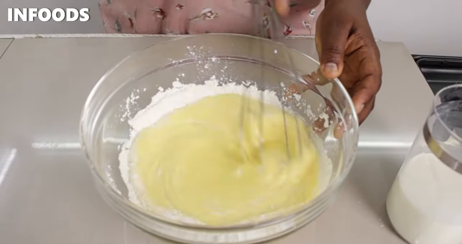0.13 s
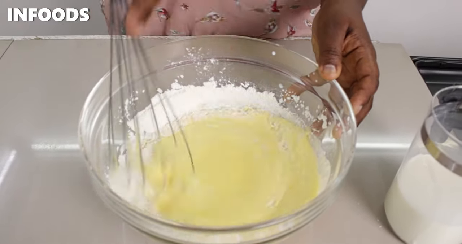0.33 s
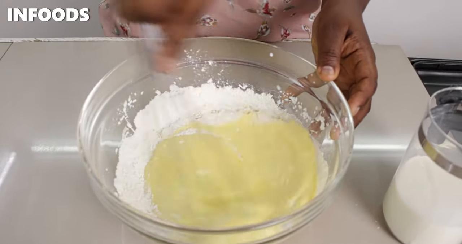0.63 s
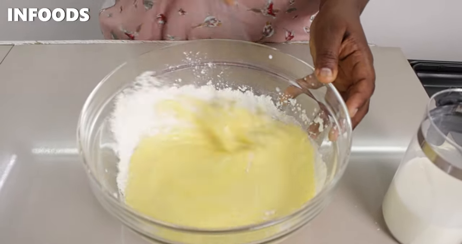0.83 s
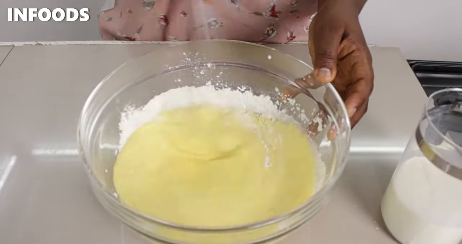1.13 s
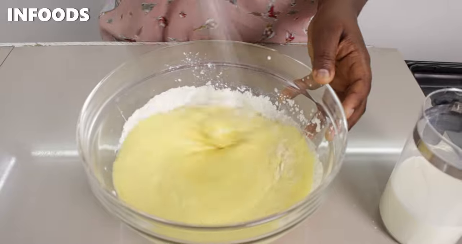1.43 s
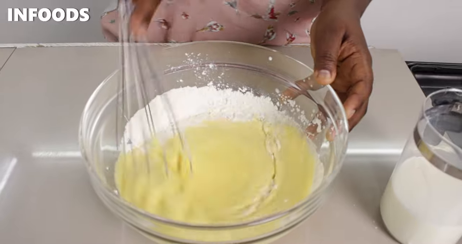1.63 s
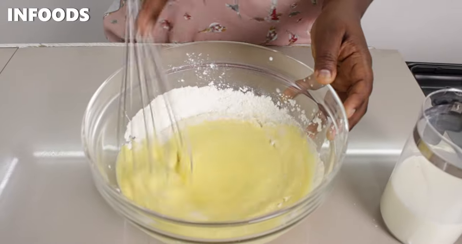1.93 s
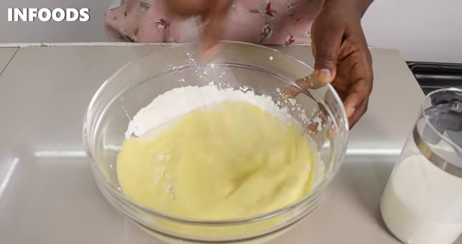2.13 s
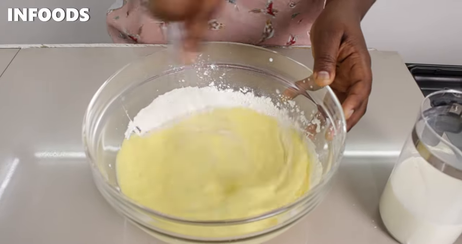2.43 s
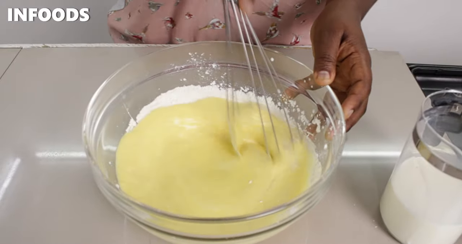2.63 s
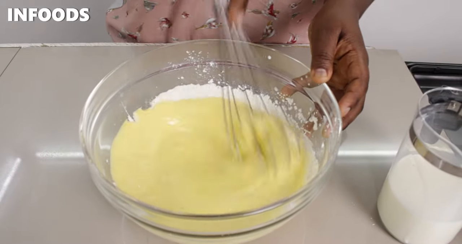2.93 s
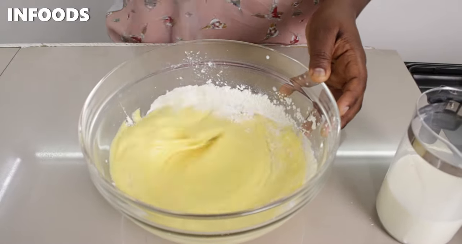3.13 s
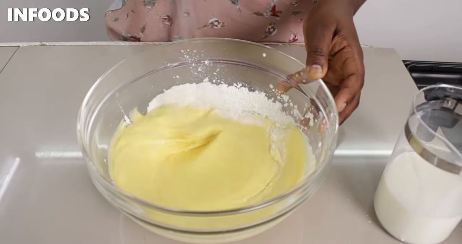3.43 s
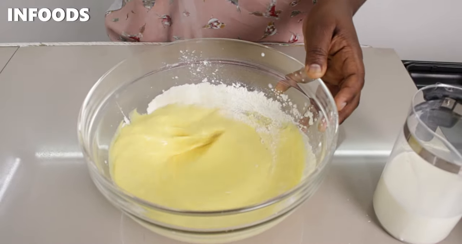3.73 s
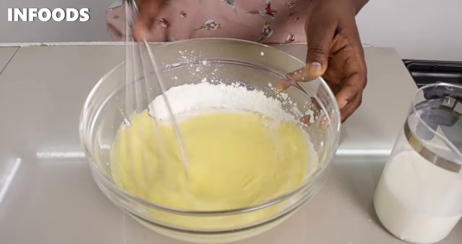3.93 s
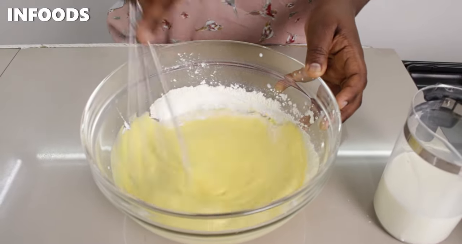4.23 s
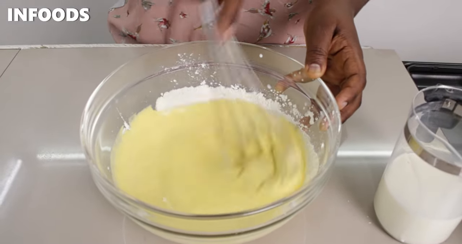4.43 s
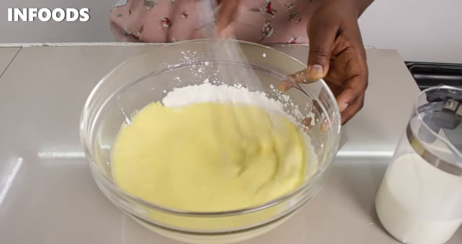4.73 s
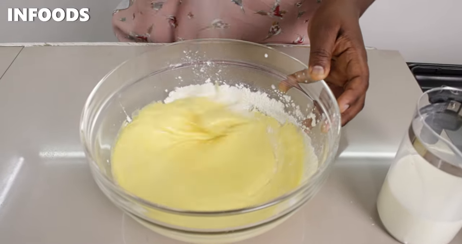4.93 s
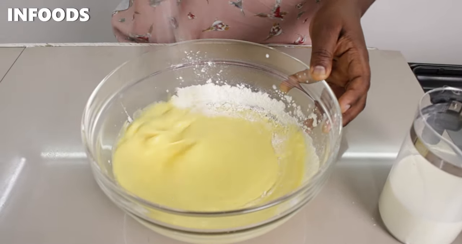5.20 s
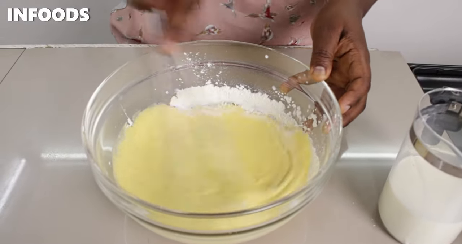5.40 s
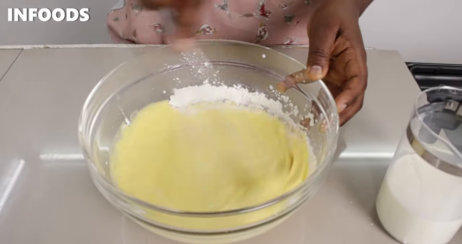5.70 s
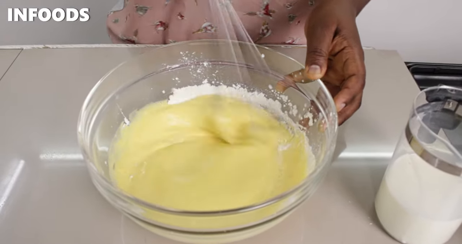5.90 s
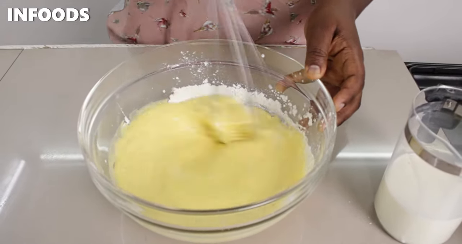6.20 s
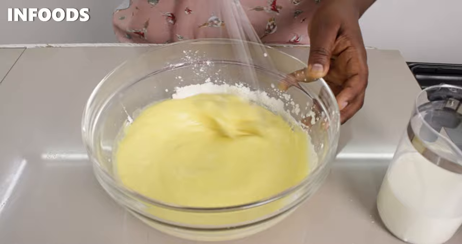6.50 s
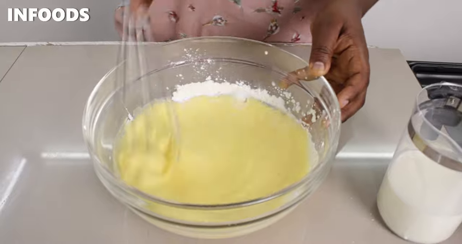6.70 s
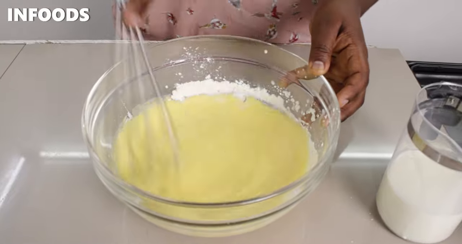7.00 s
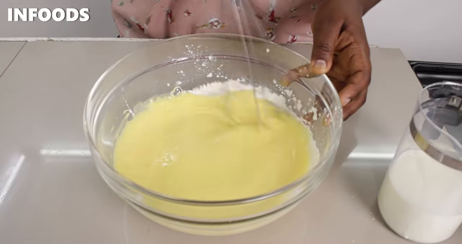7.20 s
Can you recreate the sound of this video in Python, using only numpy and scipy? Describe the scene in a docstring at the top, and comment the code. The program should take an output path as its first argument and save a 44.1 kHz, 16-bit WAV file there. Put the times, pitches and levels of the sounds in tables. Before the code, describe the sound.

A wire whisk beats thick batter in a glass bowl, nearly four quick turns a second, clattering lightly on the glass with wet slosh and gulps.

```python
"""A wire whisk beats egg batter and flour in a hand-held glass bowl, nearly four turns a second.
On each turn the wires clatter over the damped glass, then scoop back through the batter, which gulps,
pops and crackles. Noise bursts make the wires, fading sine waves the bowl and bubbles, and coloured noise
the stirring; a small kitchen echoes them over its quiet air.
One passage of beating is spliced end to end, so the same strokes come round again."""
import sys
import numpy as np
from scipy import signal
from scipy.fft import rfft, irfft, next_fast_len
from scipy.io import wavfile
from scipy.ndimage import uniform_filter1d

SR = 44100
rng = np.random.default_rng(int(sys.argv[2]) if len(sys.argv) > 2 else 0)


def pcm_store(signal):
    """Save signal as 16-bit PCM."""
    levels = np.round(np.clip(np.atleast_2d(signal), -1, 1) * 32767)
    wavfile.write(sys.argv[1], SR, levels.astype(np.int16).T)


N = 324299  # samples in the whole scene
M = 3 * SR  # samples in the passage of beating

# The whisk swings into the glass, once a turn. Levels are relative; later trims shift them. Columns:
# hardest wire t/s, first wire this much earlier/s, gap between later wires/s,
# bowl knock level/dB, wire clack level/dB, bright tick level/dB, drag through the batter/s
STRIKES = [(0.0088, 0.00095, .0135, -39, -45, -51, 0.048), (0.2528, 0.00053, .0127, -41.5, -42, -42, 0.056),
           (0.521, 0.0063, .0105, -41.5, -42, -38, 0.039), (0.784, .007, .011, -44.5, -49.5, -47.5, 0.037),
           (1.0515, .001, .0166, -44.5, -47, -56.5, 0.045),
           (1.3371, .012, 0.0096, -43.5, -49.5, -51.5, 0.028), (1.62, 0.014, 0.018, -42.5, -48, -51.5, .05),
           (1.8075, .0132, .014, -39, -46.5, -44, 0.048), (2.0527, 0.021, .008, -43, -45.5, -50.5, 0.026),
           (2.3013, .004, 0.015, -45.5, -47.5, -51, 0.058), (2.5702, 0.014, 0.016, -43, -44.5, -55, 0.014)]
# Half a turn later it scoops back through the batter (same columns)
SCOOPS = [(0.146, 0.0069, .0235, -48.5, -50, -57, 0.085), (0.3692, 0.0055, .017, -51, -49.5, -52, 0.049),
          (0.6259, .026, .012, -46, -51, -56, 0.018), (0.9251, 0.0052, .012, -55.5, -51.5, -57, 0.096),
          (1.1971, 0.0064, .012, -52.5, -46, -51, .015), (1.4689, 0.0053, .012, -56, -52, -53.5, 0.061),
          (1.6757, .0077, .0196, -39.5, -42.5, -46, 0.028), (1.926, 0.0048, .01, -50.5, -50.5, -51, 0.083),
          (2.1755, 0.0043, .014, -45, -43.5, -48, 0.065), (2.4292, .005, .01, -48.5, -53, -69, 0.046),
          (2.6873, 0.007, .007, -50.5, -48, -48.5, 0.038)]
# Colour of wet films and of neighbouring wires: f/Hz, relative level/dB
WET = [(400, -40), (1000, -5.5), (2000, -2.5), (2450, 6), (3200, 12), (4400, 1.5), (6100, 13.5),
       (7000, 0.5), (8000, -28), (11000, -26), (13500, -34), (15000, 3), (16500, -25)]


def amp(db):
    """Turn decibels into gain."""
    return 10 ** (np.asarray(db) / 20)


def unit(x):
    """Scale to an rms (average strength) of 1."""
    return x / np.sqrt(np.mean(x ** 2) + 1e-20)


def along(points, hz):
    """Read a value at each frequency from (Hz, value) points, on a log frequency axis."""
    f, value = np.transpose(points)
    return np.interp(np.log(hz + 1), np.log(f + 1), value)


def add(track, s, sound):
    """Mix a sound into the track at time s, dropping what falls outside."""
    start = round(s * SR)
    sound = sound[max(-start, 0):]
    part = track[max(start, 0):][:len(sound)]
    part += sound[:len(part)]


def coloured(x, points, vary_db=0, size=3072):
    """Filter x to a spectrum, with unit filter energy and bands shifted at random by vary_db."""
    hz = np.fft.rfftfreq(size, 1 / SR)
    bands = np.geomspace(200, 16000, 28)
    shift_db = vary_db * rng.standard_normal(len(bands))
    level_db = along(points, hz) + along(np.transpose([bands, shift_db]), hz)
    # fold the cepstrum (the spectrum of the log spectrum) so the filter never sounds ahead of its input
    cepstrum = irfft(np.log(amp(level_db)))
    cepstrum[1:size // 2] *= 2
    cepstrum[size // 2 + 1:] = 0
    response = irfft(np.exp(rfft(cepstrum)))
    return signal.fftconvolve(x, response / np.linalg.norm(response))[:len(x)]


def sized(x, db, length=0.0037):
    """Give x the energy of a burst of this level (dB) and length (s)."""
    return amp(db) * np.sqrt(length * SR) * x / np.linalg.norm(x)


def drag(strokes, rise, fall_db_per_s):
    """Each stroke swells for a share (rise) of its drag, holds and dies away; gives two powers."""
    t, power = np.arange(M) / SR, np.zeros((2, M))
    for s, lead, _, knock, clack, _, length in strokes:
        near = np.abs(t - s) < .4
        early = np.maximum(s - lead - t[near], 0)
        late = np.maximum(t[near] - s - length, 0)
        shape_db = -20 * early / (rise * length) - fall_db_per_s * late
        # slosh follows the knock, crackle the clack
        power[:, near] += (amp([[knock], [clack]]) * amp(shape_db)) ** 2
    return power


def stirring(strike_db=-6, scoop_db=-3, idle_slosh_db=-61, idle_crackle_db=-63):
    """Slosh and crackle levels (dB): strikes bite fast, scoops gather slowly, batter never quite rests."""
    strikes = amp(strike_db) ** 2 * drag(STRIKES, rise=0.19, fall_db_per_s=196)
    scoops = amp(scoop_db) ** 2 * drag(SCOOPS, rise=0.75, fall_db_per_s=193)
    idle = amp([[idle_slosh_db], [idle_crackle_db]]) ** 2
    return 10 * np.log10(strikes + scoops + idle)


def grains(per_second, spread_db, smooth):
    """Scattered impulses of uneven size on a bed of noise."""
    hit = rng.random(M) < per_second / SR
    size = amp(spread_db * np.minimum(rng.standard_normal(M), 2)) * rng.choice([-1, 1], M)
    return unit(unit(hit * size) + smooth * rng.standard_normal(M))


def bubbles(level_db, per_second=200, middle_hz=2200, spread=0.711, cycles=16):
    """Many tiny bubbles burst where the batter tears, each a short note at its own pitch."""
    out, t = np.zeros(M), np.arange(SR // 40) / SR
    for pitch, size in rng.standard_normal((round(per_second * M / SR), 2)):
        start = rng.integers(M)
        hz = np.clip(middle_hz * np.exp(spread * pitch), 500, 12000)
        age = hz * t / cycles  # counted in cycles, so small, high bubbles die sooner
        swell = (1 - np.exp(-age * 20)) * amp(-30 * age)
        note = np.sin(2 * np.pi * hz * t * (1 + 0.023 * age))  # the pitch creeps up
        add(out, start / SR, amp(level_db[start] + 1.8 * min(size, 2)) * swell * note)
    return out


def batter(thrum_db=-1, slosh_db=-5, wet_db=-9.5, bubble_db=-0.5):
    """Dragging wires shake the bowl on the counter, churn the batter and tear its wet films."""
    # the hand's push on the bowl: t/s, level before thrum_db/dB
    push_points = [(0.0, -55), (0.72, -56), (0.8, -67), (0.83, -56.5), (0.98, -47.5), (1.11, -64),
                   (1.15, -50), (1.32, -54), (1.4, -68), (1.57, -55), (2.23, -61), (2.3, -53.5),
                   (2.37, -84), (2.42, -57.5), (2.57, -80), (2.71, -46.5), (2.77, -65), (2.8, -55)]
    # colour of the shaking bowl: f/Hz, relative level/dB
    thrum_colour = [(20, -43), (40, -51), (60, -13.5), (85, -5), (100, -5.5), (112, 8), (124, -3.5),
                    (150, -6.5), (200, -17.5), (300, -14.5), (800, -62)]
    # colour of the churning batter: f/Hz, relative level/dB
    slosh_colour = [(70, -16.5), (170, 4.5), (270, 3), (390, -4.5), (500, -5.5), (660, 2), (880, -24.5),
                    (1300, -13), (2200, -20), (5000, -66)]
    push = np.interp(np.arange(M) / SR, *np.transpose(push_points))
    slosh, crackle = stirring()

    thrum = coloured(rng.standard_normal(M), thrum_colour, size=16384)
    # even out the noise, so the hand's push alone sets its strength
    thrum /= np.sqrt(np.abs(uniform_filter1d(thrum ** 2, size=3000)) + 1e-6)
    churning = grains(per_second=220, spread_db=-1, smooth=0.95)
    churn = coloured(amp(slosh + slosh_db) * churning, slosh_colour)
    tearing = grains(per_second=420, spread_db=5, smooth=.3)
    films = coloured(amp(crackle + wet_db) * tearing, WET)
    return amp(push + thrum_db) * thrum + churn + films + bubbles(crackle + bubble_db)


def quiet_air(air_db=-70):
    """The quiet room itself: a faint, steady noise."""
    # colour of the room's air: f/Hz, relative level/dB
    air_colour = [(25, -22), (80, 3), (300, 3), (1500, -23), (6000, -14), (9000, -33), (16000, -26)]
    return amp(air_db) * coloured(rng.standard_normal(M), air_colour)


def stroke_wires(strokes, first_db, later_db, loss_db, count):
    """The cage rolls over the glass: a light first wire, the hardest one, then ever weaker followers."""
    rows = []
    for s, lead, gap, *levels, _ in strokes:
        wires = [(s - lead, first_db), (s, 0)]
        wires += [(s + gap * (k + 1), later_db - loss_db * k) for k in range(count)]
        rows += [(when, *(np.array(levels) + db)) for when, db in wires]
    return rows


def landings(single_tick_db=-7.5):
    """Every wire that meets the glass: (t/s, knock/dB, clack/dB, tick/dB)."""
    # further single wires touching the glass, within or between strokes, relative levels:
    # t/s, bowl knock level/dB, wire clack level/dB
    single_list = [(0.1944, -69, -49.5), (0.8188, -52, -48), (1.0681, -44.5, -44), (1.2898, -50, -57.5),
                   (1.3643, -47, -49), (1.5567, -53.5, -54), (1.9931, -48, -45.5), (2.116, -49, -53),
                   (2.4907, -48.5, -51.5), (2.4968, -49, -45), (2.7556, -65, -54), (2.7965, -68, -51)]
    strikes = stroke_wires(STRIKES, first_db=-4, later_db=-3.5, loss_db=11.5, count=2)
    scoops = stroke_wires(SCOOPS, first_db=-4, later_db=-4, loss_db=6, count=1)
    # a single wire's tick is set relative to its clack
    singles = [(s, knock, clack, clack + single_tick_db) for s, knock, clack in single_list]
    return strikes + scoops + singles


def contact(t, squeeze, t60, chatter):
    """A wire squeezes out a film of batter, lands within a millisecond or two and chatters briefly."""
    blow = rng.standard_normal(len(t)) * np.exp(-(t / .0008) ** 2)
    # rises 60 dB over squeeze (s) before the blow, falls 60 dB over t60 (s) after it
    skid = rng.standard_normal(len(t)) * amp(-60 * np.maximum(t / t60, -t / squeeze))
    return blow / np.linalg.norm(blow) + chatter * skid / np.linalg.norm(skid)


def rattle(t, t60=0.054, per_second=260, spread_db=4):
    """Neighbouring wires brush the glass just before and after the one that strikes."""
    lead = .02  # s for a 60 dB rise
    size = amp(spread_db * rng.standard_normal(len(t)))
    touch = (rng.random(len(t)) < per_second / SR) * size
    friction = uniform_filter1d(touch, size=60) + .0012
    return friction * rng.standard_normal(len(t)) * amp(-60 * np.maximum(t / t60, -t / lead))


def taps(knock_db=1, ring_db=-5, clack_db=.5, tick_db=1, rattle_db=-7, sparkle_db=-9):
    """Each wire knocks the bowl, rings it briefly and clacks, its colour varied at random from tap to tap."""
    # notes of the bowl, damped by batter and hand: f/Hz, relative level/dB, time to fall 60 dB/s
    bowl_notes = [(466.2, -0.5, 0.52), (529, 13.5, 0.012), (650, -9.5, 0.39), (720, -21, 0.041),
                  (1115, -8, 0.14), (1135, -16.5, 0.05), (1289, 3.5, 0.11), (1312, 2, 0.04),
                  (2013, -2.5, 0.093), (2045, -0.5, 0.19)]
    # colours of the knock, the clack and the bright tick: f/Hz, relative level/dB
    knock_colour = [(30, -27), (200, -15.5), (390, -2.5), (520, 6.5), (680, 0.5), (880, -9), (1150, -2),
                    (1600, -17.5), (2100, -18), (3500, -22), (8000, -36)]
    clack_colour = [(700, -21), (1800, -3), (2500, -3.5), (3150, 3.5), (4000, -2.5), (5000, -1.5),
                    (6150, 0), (6900, -1.5), (8000, -13.5), (12000, -18)]
    tick_colour = [(4000, -43), (7000, -10), (9000, -6), (11200, -13), (12200, -2), (13000, -18),
                   (14000, -28), (14850, 13), (15600, -7.5), (16500, -1)]
    out, t = np.zeros(M), np.arange(-SR // 50, SR // 6) / SR
    hz, level, t60 = np.transpose(bowl_notes)[:, :, None]
    after = np.maximum(t, 0)  # the bowl is silent before the blow
    modes = amp(level - 60 * after / t60) * np.sin(2 * np.pi * hz * after)
    for s, knock, clack, tick in landings():
        # each tap excites the bowl's notes in a different random mix
        strength = amp(7.6 * rng.standard_normal(len(bowl_notes))) * rng.choice([-1, 1], len(bowl_notes))
        tap = sized(strength @ modes, knock + ring_db)
        thud = contact(t, squeeze=0.014, t60=0.038, chatter=2.0)
        tap += sized(coloured(thud, knock_colour, vary_db=3), knock + knock_db)
        clatter = contact(t, squeeze=0.031, t60=0.015, chatter=0.89)
        tap += sized(coloured(clatter, clack_colour, vary_db=5.5), clack + clack_db)
        bright = contact(t, squeeze=0.0055, t60=0.0032, chatter=2.7)
        tap += sized(coloured(bright, tick_colour, vary_db=4.0), tick + tick_db)
        others = rattle(t)
        tap += sized(coloured(others, WET, vary_db=11.5), clack + rattle_db)
        tap += sized(coloured(others, tick_colour), tick + sparkle_db)
        add(out, s + t[0] + .0005, tap)
    return out


def bubble(t, hz, t60, attack, rise, rough):
    """A pocket of air rings with a soft start and a rising, unsteady pitch."""
    pitch = hz * (1 + rise * t / t60 + rough * rng.standard_normal(len(t)))
    swell = (1 - np.exp(-(t / attack) ** 2)) * amp(-60 * t / t60)
    return swell * np.sin(2 * np.pi * np.cumsum(pitch) / SR)


def pops(pop_db=3, t60=0.012, attack=0.00046, rise=0.043, rough=0.24):
    """A bursting bubble rings for a few milliseconds, its pitch rising as it opens."""
    # air bubbles bursting in the batter: t/s, level before pop_db/dB, starting pitch f/Hz
    pop_list = [(0.0138, -35, 6560), (0.3785, -42, 3840), (0.5148, -36, 3200), (0.5207, -27, 6140),
                (0.7128, -46, 13300), (0.784, -30.5, 6060), (0.8927, -41.5, 5300), (1.123, -41.5, 6670),
                (1.798, -25, 6000), (2.243, -40.5, 3250)]
    out, t = np.zeros(M), np.arange(SR // 30) / SR
    for s, db, hz in pop_list:
        add(out, s, amp(db + pop_db) * bubble(t, hz, t60, attack, rise, rough))
    return out


def gulps(gulp_db=0, t60=0.074, attack=0.0017, rise=0.19, rough=1.0):
    """Big air pockets in thick batter give low, unsteady, quickly damped notes."""
    # air pockets closing behind the whisk: t/s, level before gulp_db/dB, starting pitch f/Hz
    gulp_list = [(.021, -40.5, 342), (0.128, -37.5, 237), (.346, -37.5, 258), (0.627, -31.5, 241),
                 (0.927, -33, 262), (1.162, -41, 188), (1.469, -42.5, 270), (1.676, -35, 276),
                 (1.92, -40, 282), (2.045, -42, 320), (2.179, -37, 241), (2.688, -37.5, 316.6)]
    out, t = np.zeros(M), np.arange(SR // 4) / SR
    for s, db, hz in gulp_list:
        add(out, s, amp(db + gulp_db) * bubble(t, hz, t60, attack, rise, rough))
    return out


def clicks(click_db=0):
    """Wires pushed aside spring back and meet, steel on steel, with no batter between them."""
    # bare wires snapping against each other: t/s, burst level before click_db/dB
    click_list = [(0.0436, -41.5), (.2987, -39), (2.3384, -34)]
    # colour of bare steel: f/Hz, relative level/dB
    steel_colour = [(500, -16), (1000, -16), (2200, -11), (3100, 2), (4000, -12), (6200, 8), (8000, -5),
                    (9500, -1), (11200, -12.5), (13500, -5.5), (15000, -0.5), (16500, 5)]
    out, t = np.zeros(M), np.arange(-SR // 100, SR // 20) / SR
    for s, db in click_list:
        snap = contact(t, squeeze=0.0006, t60=0.0095, chatter=1.3)
        add(out, s + t[0], sized(coloured(snap, steel_colour, vary_db=2.5), db + click_db))
    return out


def kitchen(x, gap=0.00055):
    """Counter and walls answer within milliseconds, with a freshly drawn echo every eighth of a second."""
    # how long the echo lasts: f/Hz, time to fall 60 dB/s
    echo_times = [(100, 0.46), (500, 0.26), (2000, 0.18), (6000, 0.19), (15000, 0.14)]
    out, step = np.zeros(M), SR // 8
    for start in range(0, M, step):
        # fading noise, redrawn each time to avoid tonal ringing
        hz, t, z = signal.stft(rng.standard_normal(SR // 3), SR, nperseg=256)
        fade = amp(-60 * t / along(echo_times, hz)[:, None])
        tail = signal.istft(z * fade, SR, nperseg=256)[1]
        tail *= 1 - np.exp(-(np.arange(len(tail)) / SR / gap) ** 2)  # soft start, gap in s
        echo = signal.fftconvolve(x[start:start + step], tail / np.linalg.norm(tail))
        add(out, start / SR, echo)
    return out


def scene(tap_room_db=-4, pop_room_db=-7, batter_room_db=-9):
    """The passage of beating in its room, played through the splices."""
    # splices: t/s, point of the passage that plays from there/s
    splice_list = [(0, 0), (2.8, 0), (5.56, 1.6454), (6.7146, 0)]
    wires, bursts, mix = taps() + clicks(), pops(), batter() + gulps()
    to_room = amp(tap_room_db) * wires + amp(pop_room_db) * bursts + amp(batter_room_db) * mix
    passage = wires + bursts + mix + kitchen(to_room) + quiet_air()
    out = np.zeros(N)
    for s, start in splice_list:
        # each piece overwrites whatever is left of the one before
        piece = passage[round(start * SR):][:N - round(s * SR)]
        out[round(s * SR):][:len(piece)] = piece
    return out[None]


def record(dry, top_hz=16000):
    """Nothing is kept at or above the band limit, top_hz."""
    size = next_fast_len(N + SR // 2)
    keep = np.fft.rfftfreq(size, 1 / SR) < top_hz
    return irfft(rfft(dry, size) * keep, size)[..., :N]


dry = scene()
out = record(dry)
pcm_store(out)
```